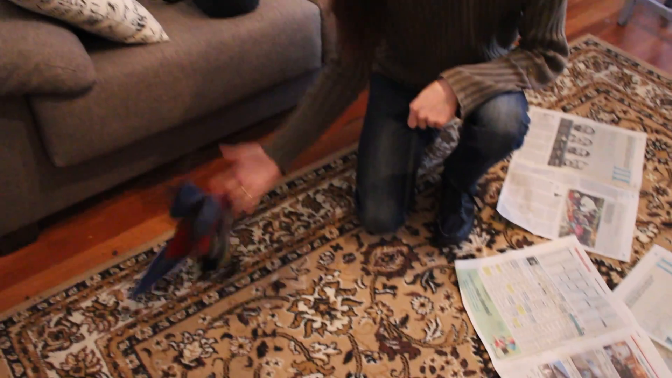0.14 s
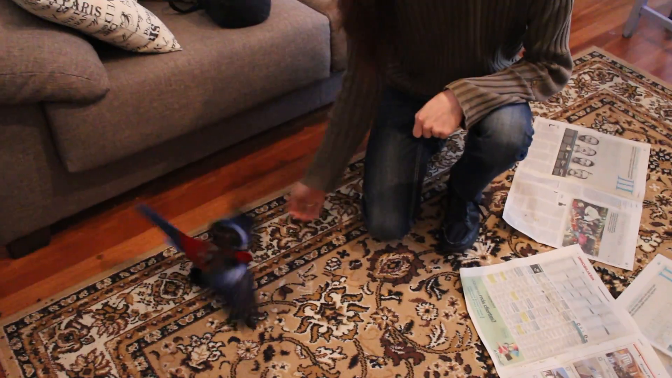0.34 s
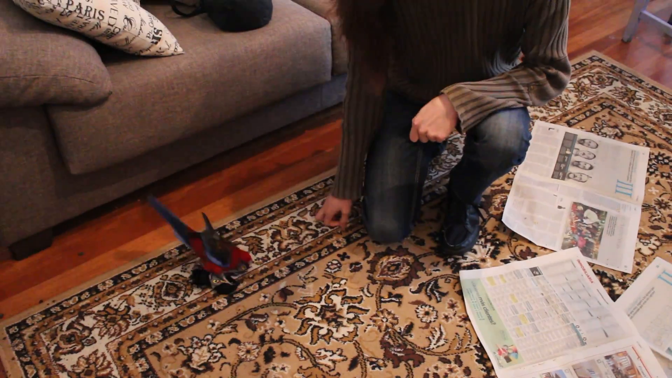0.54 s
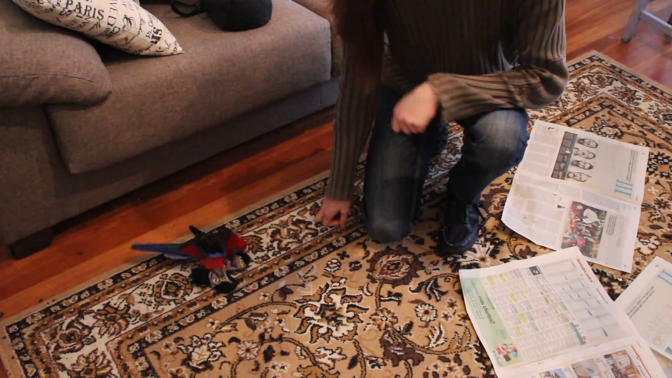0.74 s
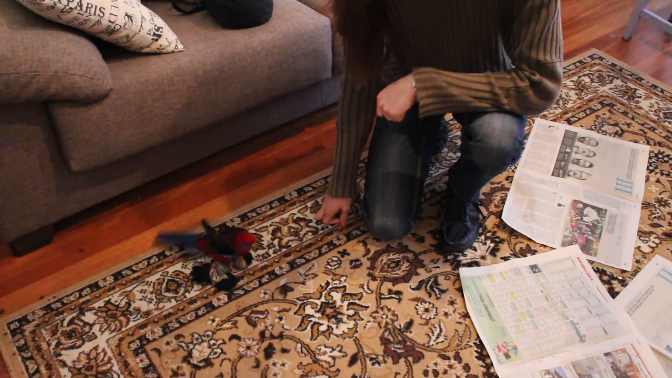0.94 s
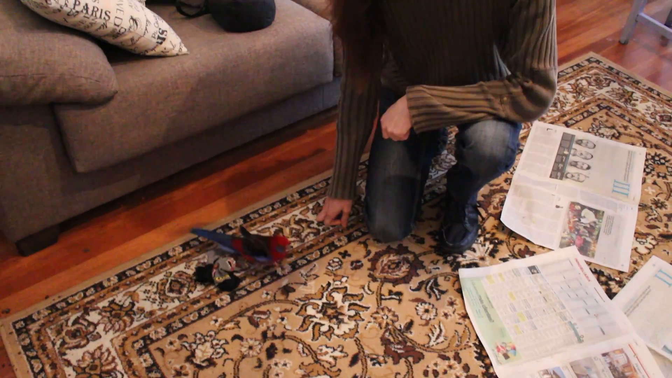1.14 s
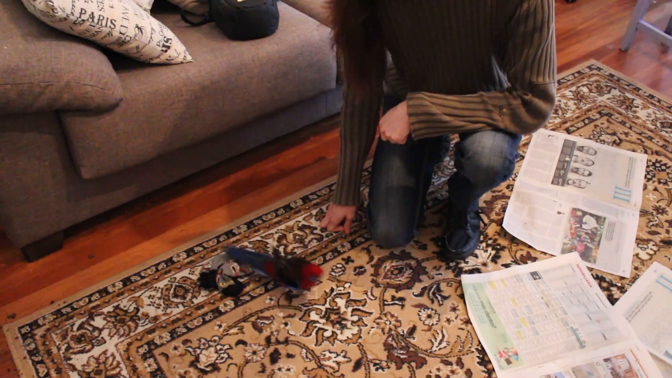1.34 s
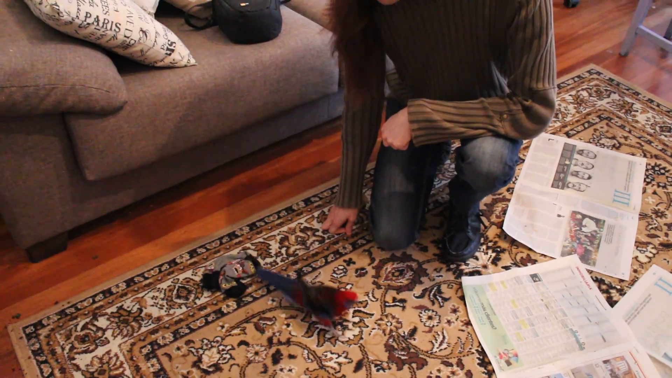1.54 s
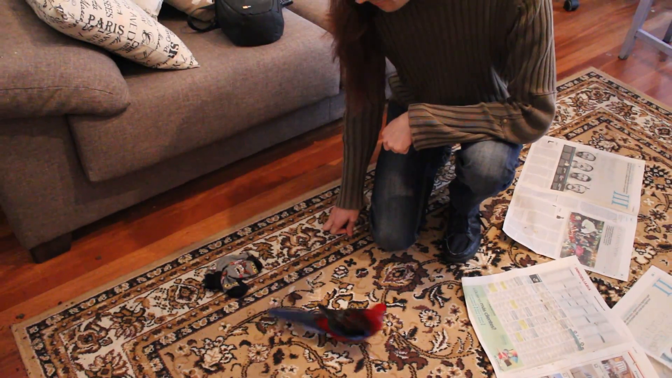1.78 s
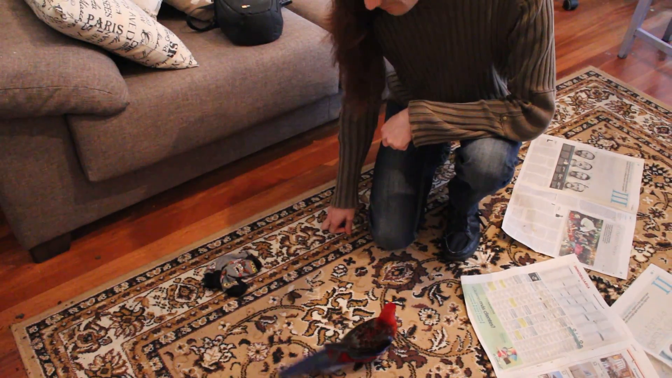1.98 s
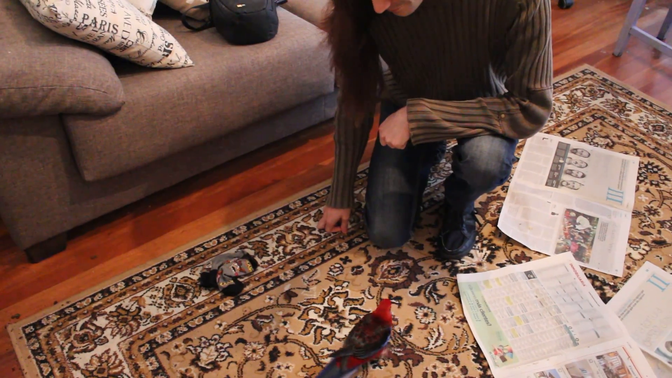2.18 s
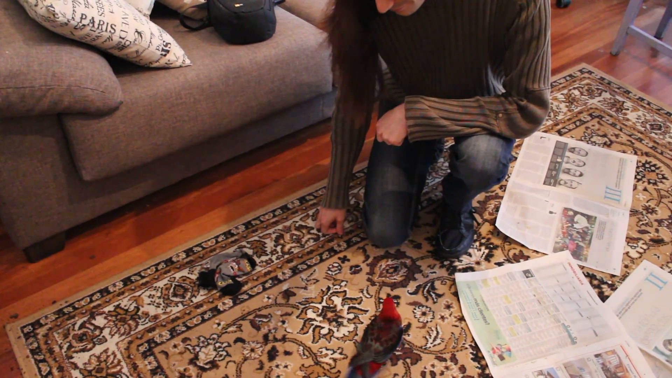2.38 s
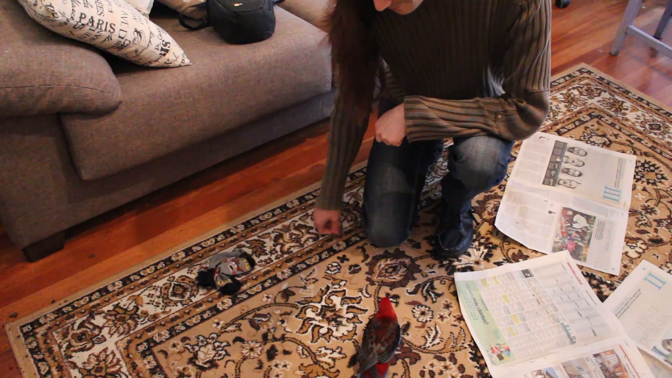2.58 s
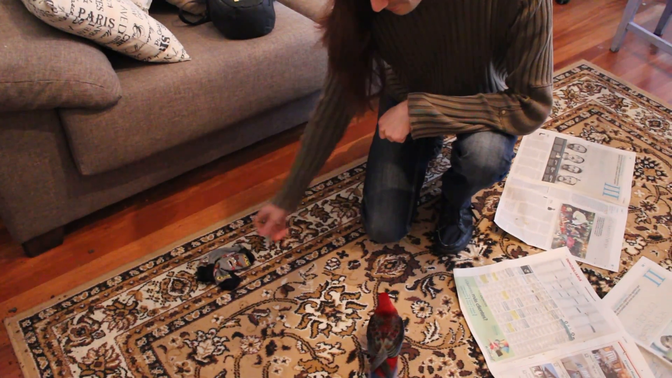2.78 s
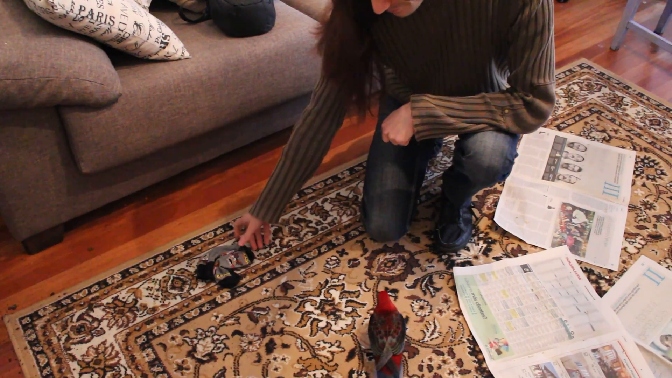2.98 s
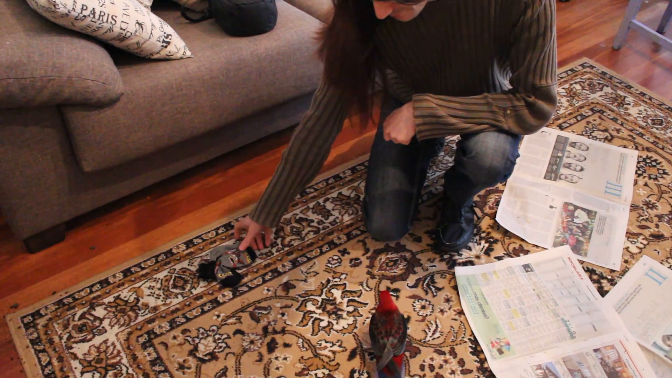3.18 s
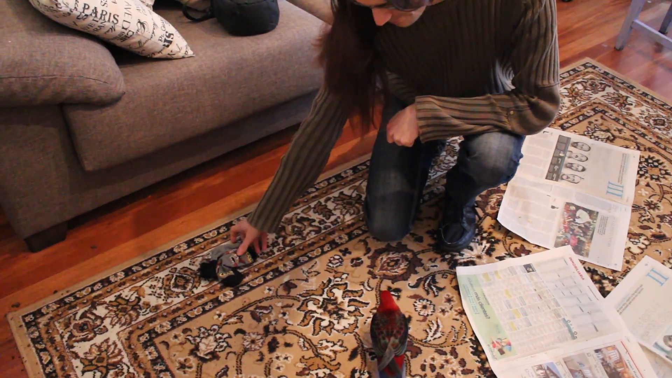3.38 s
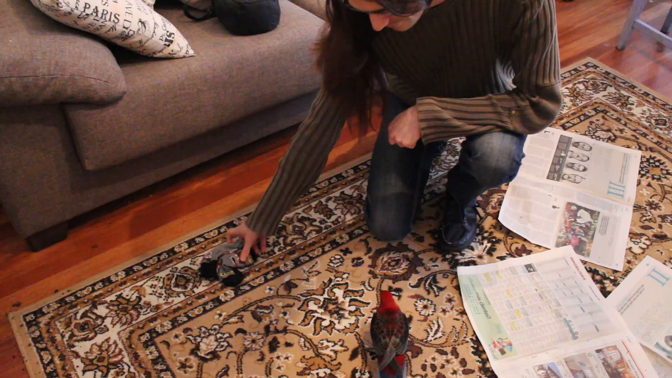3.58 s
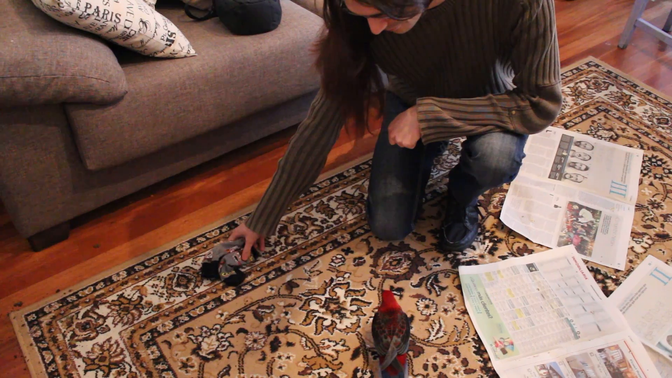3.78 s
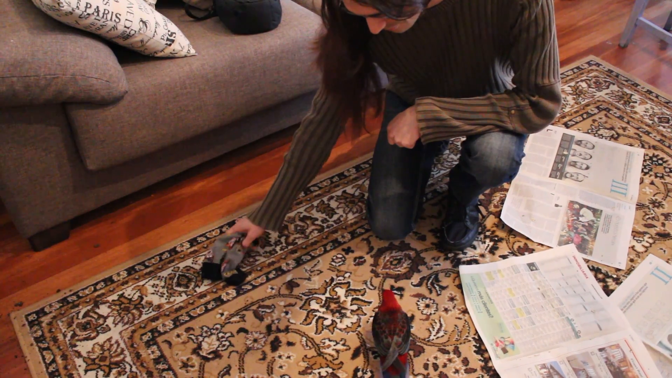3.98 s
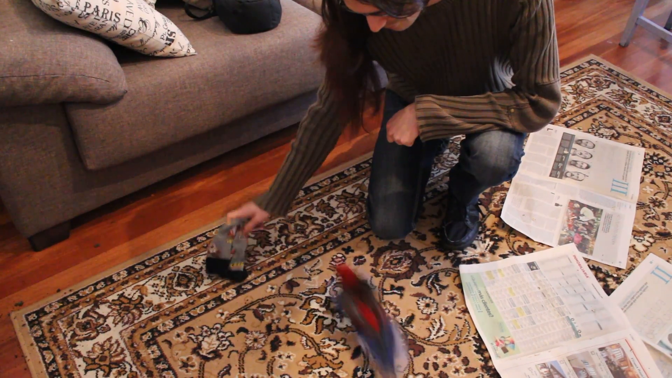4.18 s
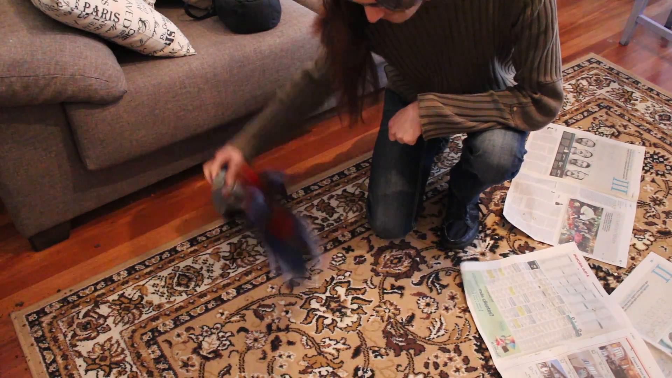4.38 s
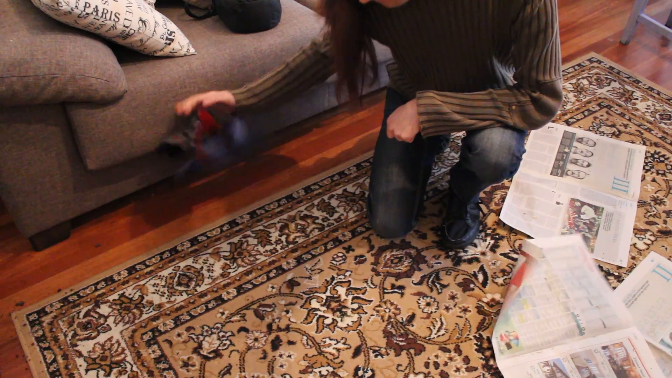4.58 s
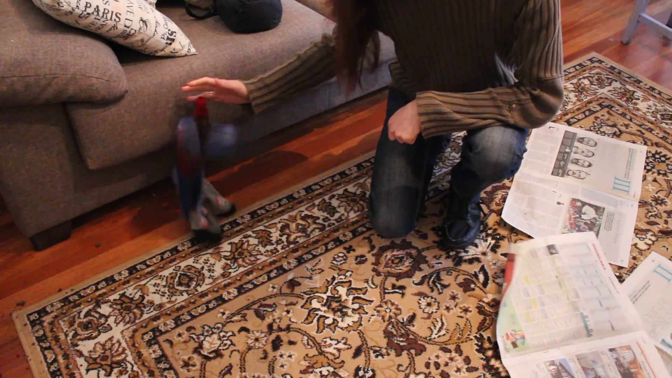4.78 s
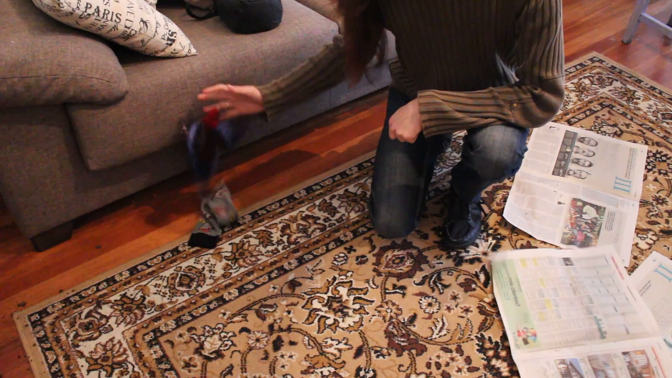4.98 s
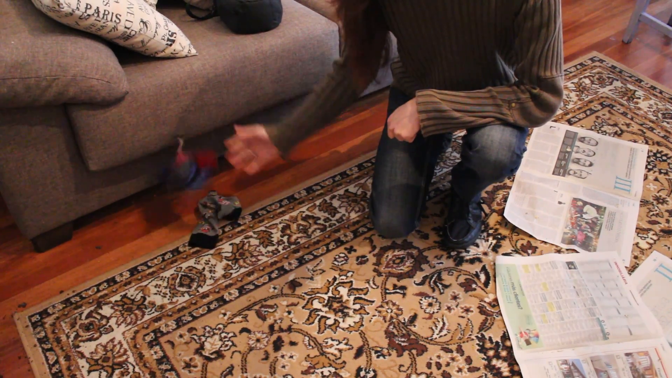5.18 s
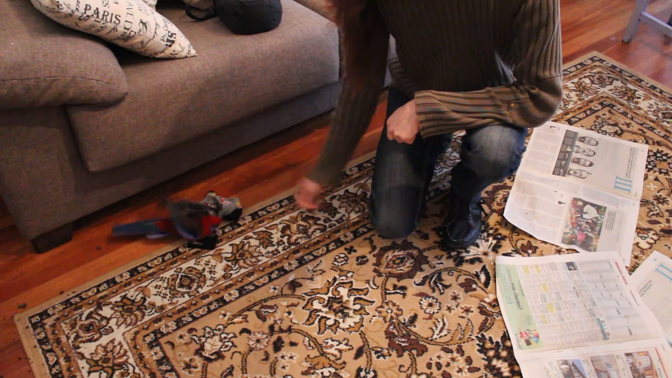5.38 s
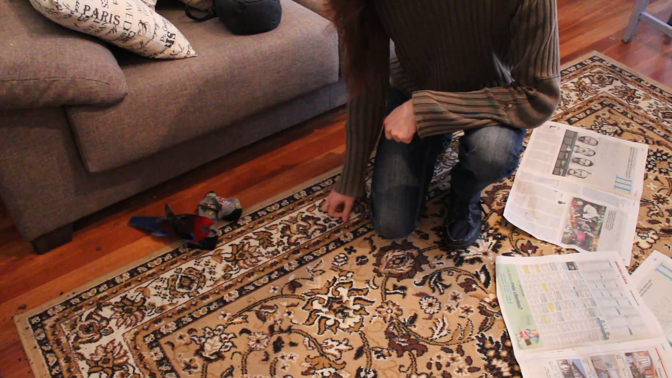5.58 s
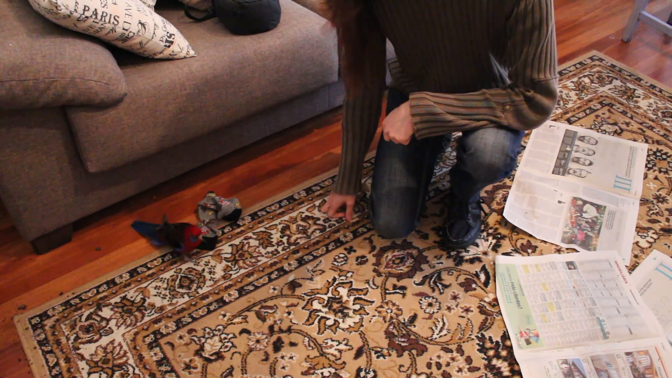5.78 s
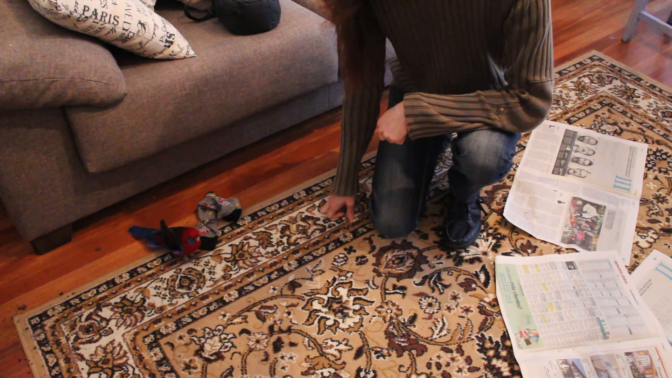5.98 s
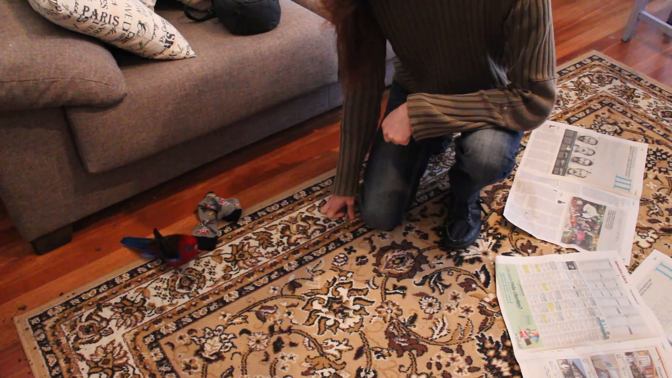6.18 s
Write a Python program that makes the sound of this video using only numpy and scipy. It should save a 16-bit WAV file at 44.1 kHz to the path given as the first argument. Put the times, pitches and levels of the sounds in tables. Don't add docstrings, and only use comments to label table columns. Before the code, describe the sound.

A small living room with short wall echoes, light stereo microphone hiss and a car's low engine and tyre rumble outside. At 0 s the ring of an earlier squawk dies away under soft wing puffs and feather rustle, with two small claw ticks near 0.3. The parrot gives brief, buzzy chirps that slide down and collapse: a loud one at 1.1 s, softer at 2.2, short and dull at 3.2. Faint foot bumps fall at 1.3 and 2.7. The car thins to near quiet by 4. From 4.4 wings flap sharply, and at 4.5 a very loud, almost pure high whistle, slightly hoarse at its start, wavers until 4.85 and rings off. Rustling, woody beak and claw ticks cluster at 5.0-5.2, with a loud chirp at 5.2, wing puff and toy thuds around 5.3-5.5, a quieter bright chirp at 5.6, then more bumps to the end as the car swells slightly.

```python
import sys
import numpy as np
from scipy import signal
from scipy.fft import rfft, irfft, next_fast_len
from scipy.io import wavfile
from scipy.ndimage import uniform_filter1d

SR = 44100
rng = np.random.default_rng(int(sys.argv[2]) if len(sys.argv) > 2 else 0)


def voltage_ratio(decibels):
    exponent = np.asarray(decibels, float) / 20
    return 10 ** exponent


def file_out(sig):
    cols = np.atleast_2d(sig).T
    lim = np.clip(cols, -1, 1)
    pcm = np.round(lim * 32767).astype(np.int16)
    wavfile.write(sys.argv[1], SR, pcm)


N = 274937
LEFT_DB = -5

# (start [s], level [dB], top pitch [Hz], length [s], upper harmonics [dB])
CHIRPS = [
    (1.129, -32, 1757, 0.044, -3),
    (2.214, -35, 1755, 0.038, -5.5),
    (3.17, -34.5, 1726, 0.034, -9.5),
    (5.187, -32.5, 1793, .047, -6),
    (5.572, -37.5, 1795, 0.049, 3),
]
# (share of length [0-1], pitch ratio [1], effort [dB])
CHIRP_SHAPE = [(0, 1, -20), (.15, .985, -4), (.42, .935, -1), (.66, .865, -1), (.8, .76, -5), (1, .45, -12)]
# (frequency [Hz], gain [dB])
THROAT = [(600, -4.5), (1600, -0.5), (2400, -10), (4800, -4), (6300, -17.5), (9500, -20.5), (11500, -13),
          (14000, -30)]
# (time [s], level [dB], left minus right [dB])
WHISTLE = [(4.457, -32.5, 1), (4.488, -27, 6), (4.498, -13, 1.5), (4.55, -19.5, 2.5), (4.59, -13.5, 0),
           (4.65, -17.5, 1.5), (4.75, -14, 3.5), (4.817, -18.5, 5.5), (4.834, -26, 11.5)]
# (multiple [1], level [dB])
WHISTLE_ORDERS = [(2, -57.5), (4, -58), (5, -65), (6, -64)]
# (time [s], width [s], left depth [0-1], right depth [0-1])
FADES = [(4.51, .005, 0.5, 0.3), (4.549, 0.0141, .8, 0.8), (4.614, 0.0063, 0.8, .7),
         (4.655, 0.0077, 0.6, 0), (4.663, 0.0097, 0, 0.9), (4.842, 0.014, 0.57, 0.7),
         (4.931, 0.0054, 0.7, 0.75)]
# (start [s], length [s], level [dB], weight [dB], quickness [dB])
RUSTLE = [(0, .06, -50.5, -6, -3), (0.075, 0.067, -52, -1, -8), (0.12, 0.15, -51.5, 7.5, -7),
          (0.289, 0.071, -48, 0, -12), (0.36, 0.043, -58, 5, 1), (0.616, 0.35, -58, -7, -11.5),
          (1.184, 0.11, -47.5, -12, -9), (2.264, .1, -51.5, -8, -11), (3.229, 0.097, -52, -11.5, -10.5),
          (4.232, 0.12, -65, 7, 3), (4.305, 0.039, -54, 1, -5), (4.371, 0.1045, -42.5, 4.5, -9.5),
          (4.498, 0.13, -46.5, 0, -1.5), (4.628, 0.074, -46, -1.5, -5), (4.746, 0.022, -36, 5, -8.5),
          (4.805, 0.059, -46.5, -14, -6.5), (4.916, .08, -58.5, -5, -1), (5.029, 0.1, -44, -7.5, -8),
          (5.145, 0.15, -40.5, -9, -11), (5.278, 0.074, -47, 2.5, -13), (5.364, 0.098, -53.5, 6, -15),
          (5.606, 0.028, -40.5, -18, -10.5), (5.669, 0.041, -43.5, -21, -12), (5.971, 0.078, -57, 7, -19)]
# (frequency [Hz], density [dB per Hz])
FEATHERS = [(220, -30), (420, -5), (600, -2), (900, -2), (1600, -5), (2200, -11), (4000, -28)]
# (time [s], peak [dB], thump [dB], brightness [dB], T60 [s])
BEATS = [(0, -47, -3, 2.5, 0.26), (.085, -56, -3, 9, 0.17), (.3, -51, 4, 7, 0.14),
         (.372, -51.5, 0, 7, 0.14), (4.378, -41.5, -5, -12.5, 0.13), (4.415, -24.5, -12.5, -8, 0.21),
         (4.473, -27, -22.5, -13, 0.17), (4.645, -35, 5.5, -12, 0.22), (4.746, -24.5, -0.5, -6.5, 0.3),
         (5.279, -36, 3, -16, 0.43)]
# (time [s], peak [dB], pitch [Hz], crack [dB])
TICKS = [(0.28, -43.5, 793, 2), (0.29, -37.5, 890, 1.5), (5.022, -37.5, 1320, -18),
         (5.036, -43, 860, -24.5), (5.045, -30.5, 885, -25), (5.114, -28, 920, -22),
         (5.174, -29.5, 914, -9.5), (5.183, -33, 1030, -19), (3.305, -46.5, 5500, -13)]
# (time [s], peak [dB], pitch [Hz], T60 [s])
BUMPS = [(1.279, -42, 360, 0.29), (2.679, -37, 245, 0.08), (5.309, -36.5, 640, 0.096),
         (5.335, -36, 445, 0.13), (5.375, -40, 428, 0.13), (4.52, -36, 365, .15), (5.353, -35.5, 249, 0.15),
         (5.409, -38, 196, 0.11), (5.452, -40.5, 427, 0.14), (5.484, -46, 194, 0.16),
         (5.54, -42.5, 220, 0.18), (5.694, -33, 593, 0.087), (5.724, -32.5, 586, 0.073),
         (5.985, -37.5, 343, 0.12)]
# (time [s], level [dB])
CAR = [(0, -55), (.3, -51.5), (.7, -52), (1.4, -50), (2.6, -52.5), (3.2, -54.5), (4.0, -62), (4.9, -66),
       (5.5, -60), (6.23, -53)]
# (frequency [Hz], width [Hz], level [dB])
RUMBLE = [(94.5, 60, -17), (141.3, 22, -6), (183.9, 11.4, 0), (240, 36, 2), (311.5, 17.5, 5.5),
          (412, 98, -2.5), (515, 110, -10)]
# (frequency [Hz], density [dB per Hz])
TYRES = [(500, 1.5), (800, 1), (1180, 3.5), (1600, -1), (2100, -6), (2600, -20.5), (4000, -36)]
# (time [s], width [s], gain [dB])
DRAUGHTS = [
    (.2, .25, 10),
    (4.45, 0.44, 11.5),
]
# (delay [s], level [dB], left minus right [dB])
ECHOES = [(.011, -9, -3), (0.017, -12, 6), (.031, -10.5, 3.5), (.048, -15.5, 4), (.072, -22.5, 7)]
# (frequency [Hz], T60 [s])
ROOM_T60 = [(100, 0.45), (1500, 0.49), (5000, 0.34), (12000, 0.3)]
# (frequency [Hz], density [dB per Hz])
HISS = [(300, -14.5), (700, -17.5), (1000, -20), (5490, -30), (15700, -40)]


def times():
    return np.arange(N) / SR


def colour(x, points):
    hz, db = np.transpose(points)
    size = next_fast_len(x.shape[-1])
    f = np.maximum(np.fft.rfftfreq(size, 1 / SR), 1)
    gain = voltage_ratio(np.interp(np.log(f), np.log(hz), db))
    return irfft(rfft(x, size) * gain, size)[..., :x.shape[-1]]


def unit(x, lo_hz, hi_hz):
    sos = signal.butter(4, [lo_hz, hi_hz], "bandpass", fs=SR, output="sos")
    band = signal.sosfilt(sos, x)
    return x / np.sqrt(np.mean(band ** 2))


def walk(rate_hz):
    k = int(SR / rate_hz)
    held = np.repeat(rng.standard_normal(N // k + 1), k)
    return 1.3 * uniform_filter1d(uniform_filter1d(held, k), k)[:N]


def noise(apart):
    mid, side = rng.standard_normal((2, N))
    return np.array([mid + apart * side, mid - apart * side])


def pan(x, db):
    half_db = db * np.ones(1) / 2
    return x * voltage_ratio(np.array([half_db, -half_db]))


def chirps():
    rasp_share, wobble_db = 0.5, 2
    out, waver = np.zeros((2, N)), walk(500)
    share, ratio, effort_db = np.transpose(CHIRP_SHAPE)
    hz, throat_db = np.transpose(THROAT)
    k = np.arange(1, 15)[:, None]
    for s, db, top_hz, length_s, upper_db in CHIRPS:
        u = np.arange(int(length_s * SR)) / (length_s * SR)
        at = slice(int(s * SR), int(s * SR) + len(u))
        f = top_hz * np.interp(u, share, ratio) * (1 + 0.05 * u ** 3 * waver[at])
        gain_db = np.interp(np.log(k * f), np.log(hz), throat_db)
        gain_db = gain_db + (2.0 + 0.26 * upper_db - 5 * u) * (k == 2) + 1.7 * (k == 3)
        gain_db = gain_db + upper_db * (k > 2) - 1.7 * u ** 4 * np.log2(k)
        flicker = waver[(at.start + 3000 * k + np.arange(len(u)) // 2) % N]
        gain_db = gain_db + 3.0 * flicker * (k > 1)
        build = np.clip(u * length_s / (0.0054 * k), 0, 1)
        gain = voltage_ratio(gain_db) * (k * f < SR / 2.5) * build
        phase = 2 * np.pi * np.cumsum(f) / SR
        note = np.sum(gain * np.sin(k * phase + 0.7 * k ** 2), 0)
        rattle = 4 * uniform_filter1d(rng.standard_normal(len(u)), size=16)
        note = note * (1 + rasp_share * u * rattle)
        level_db = db + 3 + np.interp(u, share, effort_db) + wobble_db * u * waver[at][::-1]
        note = note * voltage_ratio(level_db) * np.minimum(1, 30 * (1 - u))
        out[:, at] += pan(note, -3.5)
    return out


def whistle():
    base_hz, attack_s = 2453, 0.003
    scoop_hz, scoop_s, climb_hz, climb_s = 110, 0.010, 52, 0.29
    hoarse_start, hoarse_s, hoarse_end = 0.5, 0.025, 0.05
    third_start_db, beak_opens_s, beak_gain_db = -52.5, 4.61, 8.5
    ring_db_per_s, ring_pan_db, ring_swing_s, ring_drift_hz_per_s = 86, -10.5, 0.04, 32

    s, db, pan_db = np.transpose(WHISTLE)
    t, after = np.maximum(times() - s[0], 0), np.maximum(times() - s[-1], 0)
    on = np.clip((times() - s[0]) / attack_s + 1, 0, 1)
    hz = base_hz - scoop_hz * np.exp(-t / scoop_s) - climb_hz * np.maximum(1 - t / climb_s, 0)
    hz = hz + ring_drift_hz_per_s * after
    rough = hoarse_end + hoarse_start * np.exp(-t / hoarse_s)
    phase = 2 * np.pi * np.cumsum(hz * (1 + 0.0015 * walk(90) + 0.04 * rough * walk(400))) / SR

    db = np.interp(times(), s, db) - ring_db_per_s * after - 300 * after ** 2
    pan_db = np.interp(times(), [*s, s[-1] + ring_swing_s], [*pan_db, ring_pan_db])
    tone = np.sin(phase + np.array([[0.25], [-0.25]])) * (1 + rough * walk(350))
    tone = pan(np.sqrt(2) * on * voltage_ratio(db) * tone, pan_db)
    for at, width_s, left, right in FADES:
        depth = np.clip([[left], [right]], 0, 1)
        tone = tone * (1 - depth * np.exp(-((times() - at) / width_s) ** 2))

    third_db = third_start_db + beak_gain_db * np.clip((times() - beak_opens_s) / 0.03, 0, 1)
    third_db = third_db - 11 * np.minimum(after / 0.0057, 1) - 150 * after
    others = 0
    for k, order_db in WHISTLE_ORDERS:
        others = others + voltage_ratio(order_db + 1.5 * walk(60) + 8 * rough * (k == 4)) * np.sin(k * phase)
    overtones = voltage_ratio(third_db) * np.sin(3 * phase) + (after == 0) * others
    flutter_db = np.array([4 * walk(200), 4 * walk(200)])
    return tone + np.sqrt(2) * on * voltage_ratio(flutter_db) * overtones


def air():
    thump_points = [(30, -14), (100, -2), (280, 0), (420, -6), (800, -30)]
    swish_points = [(1300, -9), (1900, 0.5), (3200, -2), (5500, -6.0), (8000, -20)]
    hiss_points = [(4000, -33.0), (6500, 0.0), (10000, -6), (13000, -7.0), (15500, -25.5)]
    rasp = unit(colour(noise(0.26), FEATHERS), 450, 1190)
    thump = unit(colour(noise(0.15), thump_points), 80, 450)
    swish = unit(colour(noise(0.51), swish_points), 2707, 3202)
    hiss = unit(colour(noise(1.0), hiss_points), 7820, 9200)
    return rasp, thump, swish, hiss


def beats(rasp, thump, swish, hiss):
    attack_s, out = 0.003, 0
    for s, db, thump_db, bright_db, t60_s in BEATS:
        t = np.maximum(times() - s, 0)
        puff = voltage_ratio(db - 12 - 60 * t / t60_s) * np.minimum(t / attack_s, 1)
        bright = voltage_ratio(bright_db) * (swish + voltage_ratio(-0.5) * hiss)
        out = out + puff * (rasp + voltage_ratio(thump_db) * thump + bright)
    return pan(out, LEFT_DB)


def rustle(rasp, thump, swish, hiss):
    rise_s, rise_share, t60_s = 0.045, 0.3, 0.37
    hiss_below_db, hiss_slope = -5, 1.6
    power = np.zeros((4, N))
    for s, length_s, db, weight_db, quick_db in RUSTLE:
        t = times() - s
        rise = np.clip(t / (rise_s + rise_share * length_s) + 0.5, 0, 1)
        shape = rise * voltage_ratio(db - 60 * np.maximum(t - length_s, 0) / t60_s)
        layer_db = np.array([[0], [weight_db], [quick_db], [hiss_below_db + hiss_slope * quick_db]])
        power += (shape * voltage_ratio(layer_db)) ** 2
    size, grain = np.sqrt(power), walk(150)
    mix = size[0] * rasp * voltage_ratio(3.9 * walk(70)) + size[1] * thump * voltage_ratio(2.9 * walk(30))
    mix = mix + (size[2] * swish + size[3] * hiss) * voltage_ratio(2 * grain)
    return pan(voltage_ratio(-4.0) * mix, -3.0)


def ticks():
    out, t = np.zeros(N), np.arange(int(0.03 * SR)) / SR
    for s, db, hz, crack_db in TICKS:
        ring = np.sin(2 * np.pi * hz * t) + 0.78 * np.sin(2 * np.pi * 1.973 * hz * t)
        crack = voltage_ratio(crack_db + 3) * rng.standard_normal(len(t))
        knock = ring * voltage_ratio(-60 * t / 0.015) + crack * voltage_ratio(-60 * t / 0.008)
        out[int(s * SR):int(s * SR) + len(t)] += voltage_ratio(db) * knock
    return pan(out, LEFT_DB)


def bumps():
    out, t = np.zeros(N + SR), np.arange(int(0.2 * SR)) / SR
    for s, db, hz, t60_s in BUMPS:
        swell = voltage_ratio(db - 60 * t / t60_s) * np.minimum(t / 0.0065, 1)
        out[int(s * SR):int(s * SR) + len(t)] += swell * np.sin(2 * np.pi * hz * t)
    return pan(out[:N], LEFT_DB)


def room(x):
    t = np.arange(int(0.7 * SR)) / SR
    hz, t60_s = np.transpose(ROOM_T60)
    tail = 0
    for f in 60 * 2 ** np.arange(8.):
        sos = signal.butter(2, [f, 2 * f], "bandpass", fs=SR, output="sos")
        band = signal.sosfilt(sos, noise(0.71)[:, :len(t)])
        tail = tail + band * voltage_ratio(-60 * t / np.interp(np.log(0.64 * f), np.log(hz), t60_s))
    tail = tail * np.clip((t - 0.006) / 0.012, 0, 1) * (1 + 0.6 * np.exp(-t / 0.04))
    tail = pan(tail / np.sqrt(np.sum(tail ** 2) / 2), LEFT_DB)
    for s, db, pan_db in ECHOES:
        tail[:, int(s * SR)] += pan(voltage_ratio(db), pan_db)[:, 0]
    return signal.fftconvolve(x.mean(0)[None], tail, axes=1)[:, :N]


def leftover():
    level_db, t60_s = -42.5, 0.34
    points = [(1200, -13), (2000, 0), (2600, -0.5), (3400, -6.5), (5000, -25.5)]
    ring = unit(colour(noise(0.4), points), 1500, 4000)
    return pan(ring * voltage_ratio(level_db - 60 * times() / t60_s), LEFT_DB)


def car():
    tyre_level_db, tyre_slope, tyre_fade_db_per_s, tyre_waver_db = -53, 1.14, 1.4, 1.2
    drone_db = -68
    rumble_db = np.interp(times(), *np.transpose(CAR))
    tyre_db = tyre_level_db + tyre_slope * (rumble_db + 50) - tyre_fade_db_per_s * times()
    deep_db = drone_db
    for s, width_s, db in DRAUGHTS:
        deep_db = deep_db + db * np.exp(-((times() - s) / width_s) ** 2)

    rumble = 0
    for hz, width_hz, db in RUMBLE:
        mode = signal.lfilter(*signal.iirpeak(hz, hz / width_hz, SR), noise(0.23))
        rumble = rumble + voltage_ratio(db + 2 * walk(9)) / np.sqrt(width_hz) * mode
    tyres = colour(noise(0.47), [(250, -19.5)] + TYRES + [(8000, -51)])
    tyres = tyres * voltage_ratio(tyre_waver_db * walk(7.2))
    deep_points = [(15, -31.5), (28, -12.5), (40, 3.5), (52, -8.5), (75, -23), (120, -41.5)]
    deep = colour(noise(0.05), deep_points)
    mix = voltage_ratio(rumble_db) * unit(rumble, 110, 680) + voltage_ratio(tyre_db) * unit(tyres, 600, 1300)
    return pan(mix + voltage_ratio(deep_db) * unit(deep, 25, 65), LEFT_DB)


def scene():
    layers = air()
    late_layers = np.roll(layers, SR, 2)
    calls, shrill = chirps(), whistle()
    moves = rustle(*layers) + beats(*late_layers) + ticks() + bumps()
    wet = room(voltage_ratio(-1.5) * calls + voltage_ratio(-20) * shrill + voltage_ratio(-12) * moves)
    return calls + shrill + moves + car() + leftover() + wet


def band_limit(x):
    return signal.sosfilt(signal.butter(12, 15810, fs=SR, output="sos"), x)


def record(dry):
    hiss_db = -64 + 3.5
    hiss = unit(colour(noise(1.0), HISS), 1700, 19000)
    heard = colour(dry, [(9000, -0.5), (12500, -7.5), (16000, -16)])
    mix = heard + voltage_ratio(hiss_db) * pan(hiss, 0.57)
    return band_limit(mix)


dry = scene()
out = record(dry)
file_out(out)
```